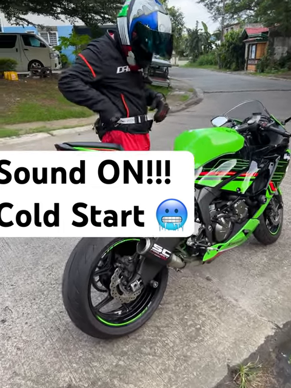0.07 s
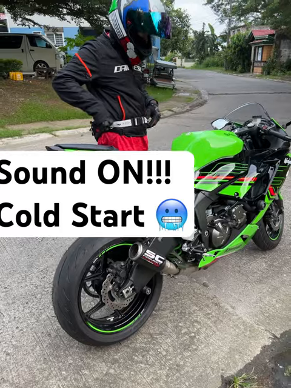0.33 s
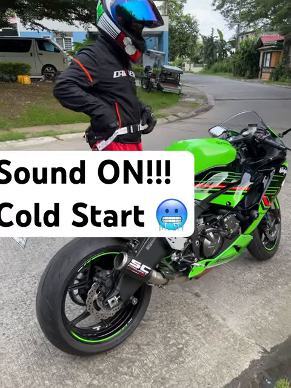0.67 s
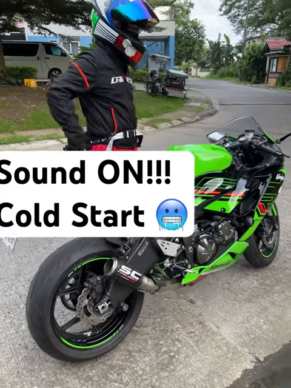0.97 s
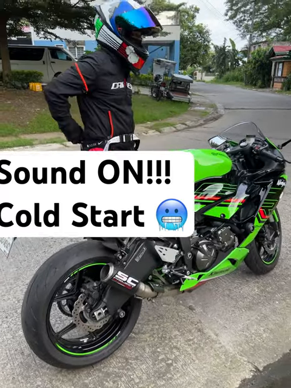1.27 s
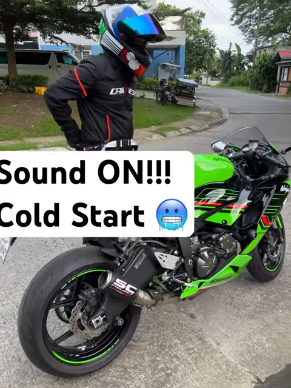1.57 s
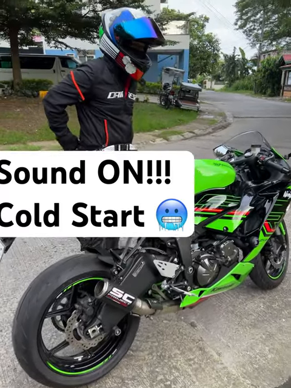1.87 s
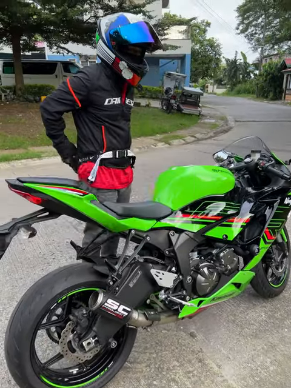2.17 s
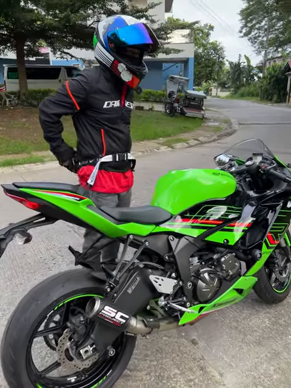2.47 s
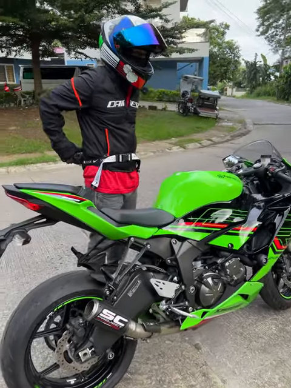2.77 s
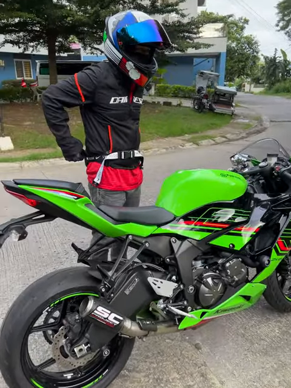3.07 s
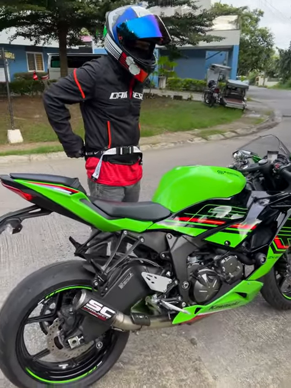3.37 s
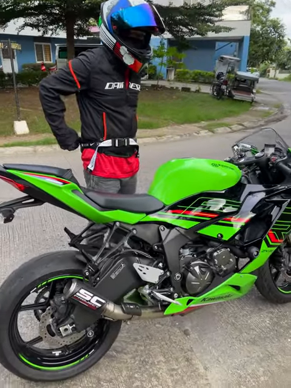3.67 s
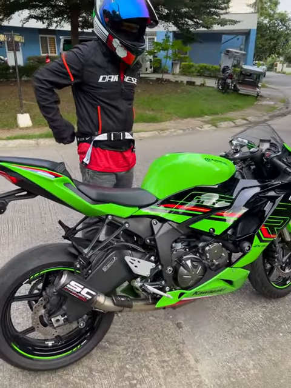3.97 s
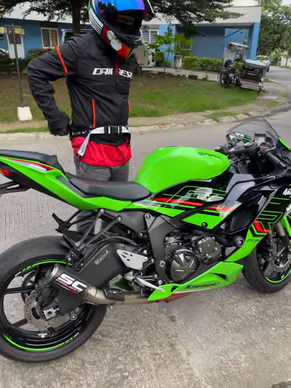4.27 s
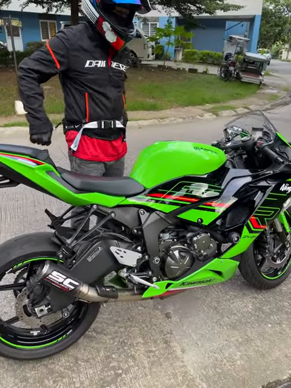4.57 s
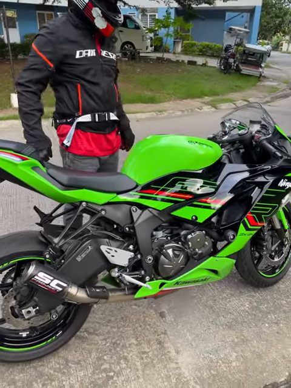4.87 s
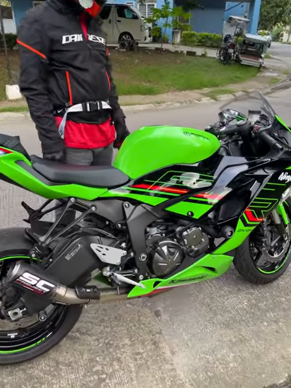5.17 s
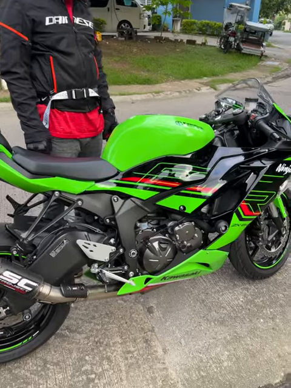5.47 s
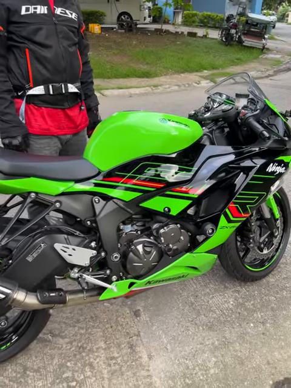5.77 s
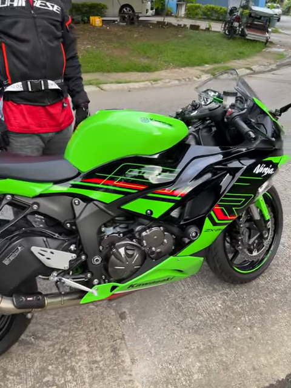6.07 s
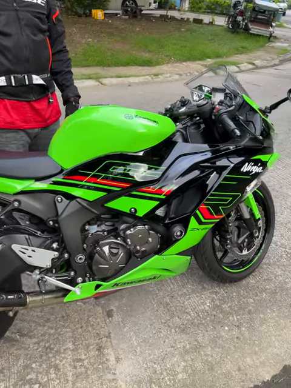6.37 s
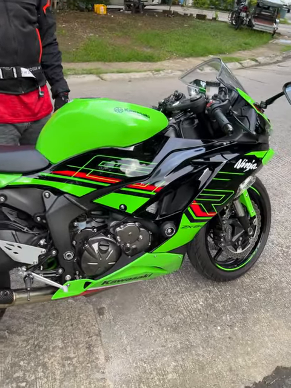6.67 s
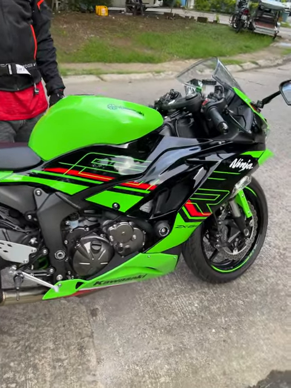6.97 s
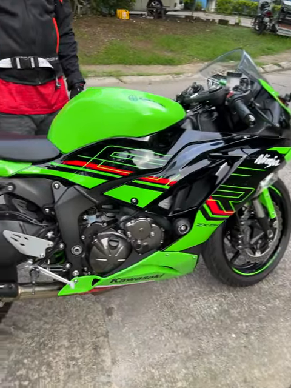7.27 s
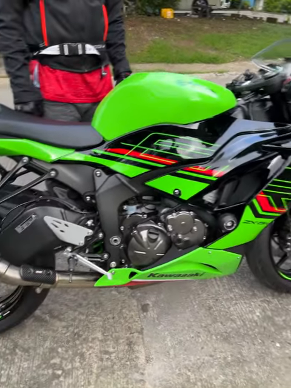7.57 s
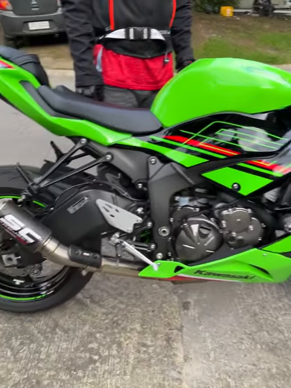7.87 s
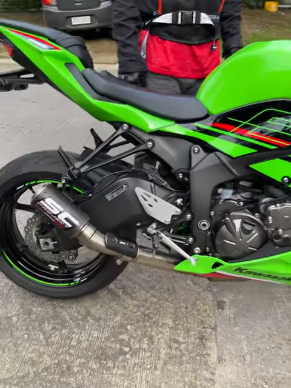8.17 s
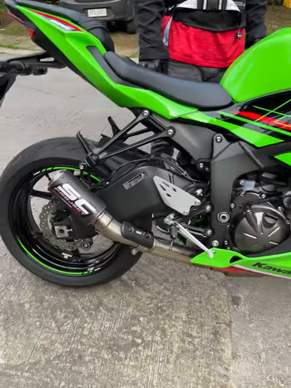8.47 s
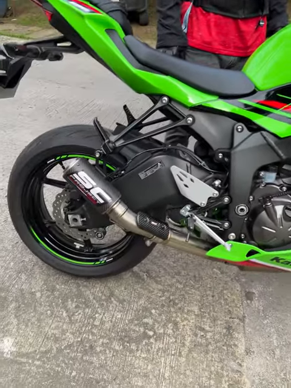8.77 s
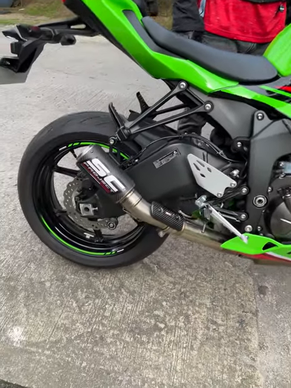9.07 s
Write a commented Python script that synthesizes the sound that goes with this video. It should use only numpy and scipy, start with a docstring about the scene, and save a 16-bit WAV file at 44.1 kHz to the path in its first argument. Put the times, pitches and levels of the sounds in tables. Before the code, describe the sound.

A cold four-cylinder sport motorcycle idles with a steady, deep exhaust drone, stumbling and popping slightly now and then.

```python
"""A four-cylinder sport motorcycle idles, still cold, on an open street.
Every firing sends a low boom, a sharp crack and a puff of gas out of the short exhaust pipe;
now and then the fuel burns weakly and the engine stumbles, or burns hard and pops.
The valves tick and the chain and gears rustle underneath, over a faint echo and the open air.
The tone changes as the microphone moves from the tail along the side of the bike."""
import sys
import numpy as np
from scipy import signal
from scipy.fft import rfft, irfft
from scipy.io import wavfile

SR = 44100
rng = np.random.default_rng(int(sys.argv[2]) if len(sys.argv) > 2 else 0)


def master(y):
    """Save y as 16-bit WAV."""
    cut = np.clip(np.atleast_2d(y).T, -1, 1)
    pcm = np.round(cut * 32767)  # scale
    wavfile.write(sys.argv[1], SR, pcm.astype(np.int16))


N = 410571
TIME = np.arange(N) / SR
IDLE_HZ = 54.5  # typical number of firings a second

# How often the engine fires, creeping up as it warms: t/s, f/Hz
FIRING_RATE = [(0.0, 53.74), (0.63, 53.23), (1.37, 54.27), (1.53, 53.01), (1.78, 54.47), (2.33, 53.6),
               (3.05, 54.23), (3.15, 55.16), (3.26, 54.19), (3.9, 54.57), (4.0, 55.18), (4.7, 54.83),
               (4.79, 53.65), (5.46, 54.96), (5.93, 54.48), (6.68, 55.25), (8.3, 54.87), (9.1, 55.3),
               (9.31, 57.5)]
# The cylinders in firing order, every second one unsteady: boom level/dB, crack level/dB, delay/s,
# push on the pipe branches (+ one, - the other), burn spread/dB, crack spread/dB
FOUR_CYLINDERS = [(0.2, 2.5, .00009, 0.77, .85, 1.8), (-0.1, -1.5, -.00007, -1.4, .45, .8),
                  (0.22, 2.2, .0001, -0.14, 0.84, 1.9), (-0.018, 0.6, -.0001, -1.5, .55, .8)]
def firings():
    """The cylinders fire in turn: gives each firing's time, boom size, crack size and branch push."""
    count = np.cumsum(curve(FIRING_RATE, TIME)) / SR
    times = np.interp(np.arange(.55, count[-1]), count, TIME)
    cylinders = np.array(FOUR_CYLINDERS)[np.arange(len(times)) % len(FOUR_CYLINDERS)]
    boom_db, crack_db, late_s, push, burn_spread_db, crack_spread_db = cylinders.T
    burn_db, sharp_db = burns(times, burn_spread_db, crack_spread_db)
    times = times + late_s + crank_lag(burn_db)
    return times, gain_of(boom_db + burn_db), gain_of(crack_db + burn_db + sharp_db), push


# Stumbles, where the fuel barely burns: t/s, change in level/dB
STUMBLES = [(0.084, -7), (0.235, -3), (0.272, -4.5), (0.383, -5), (0.421, -3.5), (0.609, -4.5), (1.02, -3),
            (1.352, -3.5), (1.983, -3), (2.317, -9), (2.653, -7.5), (2.8, -4), (4.412, -6.5), (4.927, -7),
            (5.075, -5.5), (7.08, -7), (7.226, -6.5), (8.024, -5), (8.751, -5)]
# Pops, where the fuel burns hard: t/s, extra crack level/dB
POPS = [(0.047, 3), (0.572, 5), (1.057, 4), (1.614, 3.5), (1.726, 5), (2.242, 3), (2.616, 4), (5.879, 6.5),
        (6.646, 4.5), (7.262, 7), (8.461, 4), (8.933, 3)]
def burns(times, burn_spread_db, crack_spread_db, rebound=0.18, crack_rebound=0.092):
    """How well each firing burns and how sharply it cracks; a poor burn leaves fuel for the next."""
    a, b, sharpness = rng.standard_normal((len(times), 3)).T
    burn_db = burn_spread_db * (1 - np.minimum((a ** 2 + b ** 2) / 2, 4))  # mostly good, sometimes poor
    sharp_db = crack_spread_db * np.clip(sharpness, -2, 1.5)
    for when, db in STUMBLES:
        nearest = np.argmin(abs(times - when))
        burn_db[nearest], sharp_db[nearest] = db, 0
    for when, db in POPS:
        nearest = np.argmin(abs(times - when))
        burn_db[nearest], sharp_db[nearest] = 0, db
    previous_db = np.append(0, burn_db[:-1])
    return burn_db - rebound * previous_db, sharp_db - crack_rebound * previous_db


def crank_lag(burn_db, sag_rise_s=.07, recover_s=.14, wander_s=.00025, jitter_s=.00005):
    """Seconds each firing is late: a weak burn slows the engine and the idle control pulls it back."""
    t = np.arange(len(burn_db)) / IDLE_HZ
    jitter, drift = rng.standard_normal((len(t), 2)).T
    sag_shape = (1 - np.exp(-t / sag_rise_s)) * np.exp(-t / recover_s)
    sag_s = .00042 * np.convolve(-burn_db, sag_shape)[:len(t)]
    # the light flywheel lets the speed wander a few times a second
    wander = filtered(drift, 2, [2.5, 6], "band", rate=IDLE_HZ)
    return sag_s + wander_s * evened(wander) + jitter_s * jitter


# Where the microphone is: t/s, place (0 behind the tail, 1 by the rear wheel, 2 beside the engine,
# 3 beside the silencer, more is further on)
MIC_PATH = [(0, 0.42), (1.5, 0.5), (2.1, 1.18), (4.1, 1.26), (5.3, 2.07), (6.3, 2.63), (7.7, 4.4),
            (9.31, 5)]
# Loudness along the way, before each sound adds its own offset:
# t/s, boom level/dB, throb level/dB, crack level/dB, gas and machinery level/dB
LOUDNESS = [(0, -14, -15, -31.5, -45.5), (0.6, -14, -16.5, -33.5, -46.7), (1.6, -14, -17, -33, -48),
            (2.1, -13, -20.3, -35, -48), (3.2, -14, -22, -36, -48.5), (4.9, -16, -26.5, -38.5, -48.5),
            (5.5, -15.5, -27, -36.5, -47.5), (7.2, -18, -27, -42, -48), (8.3, -18, -24, -37.5, -46.5),
            (9.3, -17.5, -22.7, -36, -46.5)]
# Tone of the boom from behind and from the side: multiple of IDLE_HZ, level/dB
BOOM_TONE_BEHIND = [(1, -17), (2, -14), (3, -10), (4, -12), (5, 5.5), (6, 1), (7, 3.5), (8, -4), (9, -17.5),
                    (10, -16), (11, -30.5), (12, -28), (13, -43), (14, -37.5)]
BOOM_TONE_SIDE = [(1, -7.5), (2, -8), (3, -3), (4, -4.5), (5, 5.5), (6, 1.5), (7, 3.5), (8, -4.5),
                  (9, -17.5), (10, -63), (11, -21), (12, -22), (13, -39.5), (14, -32.5)]
# Notes of the gas swinging between the two pipe branches: f/Hz, width/Hz, level/dB
BRANCH_NOTES = [(174.8, 12, -10), (359.5, 15.5, -3.5), (386, 20, 0.5), (500, 49, -1)]
def exhaust_boom(times, sizes, push, lag_s=0.0012, branch_db=-19.5, sloshing=0.89, throb_db=-1.0):
    """Pressure pulses ring the pipe and swing the gas between its two branches."""
    times = times + lag_s
    # the pistons pump the same volume however well the fuel burns, so the lowest notes stay even
    pulses = clicks(times, np.ones(len(times))) + filtered(clicks(times, sizes - 1), 1, 90, "high")
    views = [coloured(pulses, [(multiple * IDLE_HZ, db) for multiple, db in tone])
             for tone in (BOOM_TONE_BEHIND, BOOM_TONE_SIDE)]
    pipe = from_place(views, curve(MIC_PATH, TIME) - .9)
    # the lowest throb comes straight from the outlet and swells when the microphone is near it
    throb = signal.sosfiltfilt(signal.butter(6, 195, fs=SR, output="sos"), pipe)
    t = TIME[:SR // 8]
    ring = sum((-1) ** k * gain_of(db) * np.exp(-np.pi * width * t) * np.sin(2 * np.pi * hz * t)
               for k, (hz, width, db) in enumerate(BRANCH_NOTES))
    pushes = sizes * push * (1 + sloshing * rng.standard_normal(len(times)))
    swing = coloured(ringing(clicks(times, pushes), ring), [(100, 0), (500, 0)])
    body = evened(pipe - throb) + gain_of(branch_db) * evened(swing)
    throb_gain = gain_of(curve(LOUDNESS, TIME, column=2) + throb_db)
    return gain_of(curve(LOUDNESS, TIME)) * body + throb_gain * evened(throb)


# Tone of the crack at places 0 to 3: f/Hz, level/dB
CRACK_AT_TAIL = [(350, -29), (600, 6.5), (715, -1), (800, -10), (1060, -3), (1260, -1), (1370, -20),
                 (1470, 0), (1630, -26), (1940, -1.5), (2640, -25.5), (3170, -8), (3860, -27), (4500, -13),
                 (7000, -13), (9100, -52), (15400, -120)]
CRACK_AT_WHEEL = [(350, -22), (600, 1), (658, 5.5), (784, -5), (878, -13), (905, -12.5), (1070, 0),
                  (1260, -11), (1440, -5.5), (1660, -5), (2000, -12), (2150, -30), (2280, -10), (2580, -15),
                  (7000, -28), (9100, -67), (15400, -120)]
CRACK_AT_ENGINE = [(330, -46), (560, -8.5), (590, -1.5), (663, 6), (777, -9), (855, -8), (1200, -7),
                   (1330, -1), (1650, -6), (1790, -15), (1930, -12), (2380, -18.5), (2910, -15),
                   (6100, -38), (7000, -29), (9100, -59), (15400, -120)]
CRACK_AT_SILENCER = [(350, -17), (600, -7.5), (672, 7), (760, -13.5), (905, -2), (973, -14.5), (1180, -8),
                     (1480, -6), (1730, -15.5), (2040, -16), (2530, -22.5), (2780, -12.5), (2980, -20.5),
                     (3550, -32), (7000, -51), (9100, -64), (15400, -120)]
def exhaust_crack(times, sizes, burst_db=-4, tail_db=-7, tearing_hz=900, front_hz=2200):
    """The steep front of each pulse snaps at the outlet and tears into swirls of gas."""
    times = times - .0007
    arrivals = times + .00007 * rng.standard_normal(len(times))
    # a harder burn only steepens the front, so its lower notes buzz evenly
    steepening = filtered(clicks(arrivals, sizes - 1), 1, tearing_hz, "high")
    front = evened(clicks(arrivals, np.ones(len(times))) + steepening)
    front = filtered(front, 2, front_hz, "low")
    burst = gain_of(burst_db) * puffs(times - .0006, sizes, rise_s=0.00066, decay_s=0.001)
    tail = gain_of(tail_db) * puffs(times, sizes, rise_s=0.0022, decay_s=0.0054)
    # the swirls are small, so they hiss only above the buzz of the pipe
    swirls = filtered(burst + tail, 2, [tearing_hz, 4000], "band")
    snap = off_ground(front + swirls)
    views = [coloured(snap, tone)
             for tone in (CRACK_AT_TAIL, CRACK_AT_WHEEL, CRACK_AT_ENGINE, CRACK_AT_SILENCER)]
    return gain_of(curve(LOUDNESS, TIME, column=3)) * from_place(views, curve(MIC_PATH, TIME))


# Tone of the escaping gas: f/Hz, level/dB
HISS_TONE = [(1500, -15.5), (3000, 2.5), (4500, -1), (6000, -4.5), (9800, -9), (11500, -4.5), (12400, -5.5),
             (15500, -7.5)]
def gas_hiss(times, sizes, offset_db=-3.5, spread_db=1):
    """Gas hisses out of the pipe with each pulse, loudest from behind."""
    sizes = sizes ** 0.25 * gain_of(spread_db * rng.standard_normal(len(times)))
    jet = puffs(times - .0014, sizes, rise_s=0.00061, decay_s=0.008)
    aim_db = -.6 * curve(MIC_PATH, TIME)
    level_db = curve(LOUDNESS, TIME, column=4) + offset_db + aim_db
    return gain_of(level_db) * evened(coloured(jet, HISS_TONE))


# Notes of the engine covers: f/Hz, time to fade by 60 dB/s, level/dB
COVER_NOTES = [(1326, 0.028, 4.5), (1980, 0.016, 1.5), (2800, 0.013, -5), (3530, 0.011, -4.5),
               (4500, 0.0039, -10), (11800, 0.0038, -4), (13000, .04, -22)]
# Tone of the chain and gears: f/Hz, level/dB
RUSTLE_TONE = [(300, -12.5), (650, 2.5), (1400, -2), (2100, -5.5), (2900, -6), (3500, -6.5), (3900, -10),
               (4700, -10), (5700, -17.5), (9800, -23), (11500, -19.5), (12400, -22), (15500, -25)]
def machinery(times, rustle_db=4.0, tick_db=-3, spread_db=3, tapping=0.31):
    """Valves land twice a firing and ring the covers, over the rustle of chain and gears."""
    landings = np.concatenate([times + .0043, times + .0135])
    sizes = gain_of(spread_db * rng.standard_normal(len(landings)))
    taps = puffs(landings, sizes, rise_s=0.00016, decay_s=0.003)
    t = TIME[:SR // 10]
    ring = sum(gain_of(db - 60 * t / fade_s) * np.sin(2 * np.pi * hz * t)
               for hz, fade_s, db in COVER_NOTES)
    ticks = gain_of(tick_db) * evened(ringing(taps, ring))
    rattle = off_bodywork(rng.standard_normal(N) + tapping * taps)
    rustle = gain_of(rustle_db) * evened(coloured(rattle, RUSTLE_TONE))
    return gain_of(curve(LOUDNESS, TIME, column=4)) * (rustle + ticks)


def off_ground(x, bounce=0.072, base_delay_s=0.00292):
    """Adds the bounce off the concrete, which comes later as the microphone moves on."""
    delay_s = base_delay_s * (1 + 0.065 * curve(MIC_PATH, TIME))
    return x + bounce * np.interp(TIME - delay_s, TIME, x)


def off_bodywork(x, scatter_db=-4, fade_s=0.063, count=12):
    """Panels and metal parts scatter the sound along paths that change as the microphone moves."""
    t = TIME[:SR // 16]
    paths = rng.standard_normal((count, len(t))) * gain_of(-60 * t / fade_s)
    scattered = from_place([ringing(x, path) for path in paths], np.linspace(0, count - 1, N))
    return evened(x) + gain_of(scatter_db) * evened(scattered)


# Tone of the open air: f/Hz, level/dB
AIR_TONE = [(20, -7), (60, 10), (200, -17), (500, -1), (1000, -16), (4000, -25)]
def street(bike, echo_db=-26, fade_s=0.46, air_db=-52):
    """A faint echo from houses and trees, and the low murmur of the open air."""
    t = TIME[:SR // 2]
    scatter = rng.standard_normal(len(t)) * gain_of(-60 * t / fade_s) * (t > .02)
    echo = ringing(bike, scatter / np.linalg.norm(scatter))
    air = evened(coloured(rng.standard_normal(N), AIR_TONE))
    return gain_of(echo_db) * echo + gain_of(air_db) * air


def gain_of(db):
    """Turns decibels into a number to multiply by."""
    return 10 ** (np.asarray(db) / 20)


def evened(x):
    """Scales a sound to an average strength (rms) of 1."""
    return x / np.sqrt(np.mean(x ** 2) + 1e-20)


def curve(rows, t, column=1):
    """Reads a table column at the times t, in straight lines from row to row."""
    rows = np.asarray(rows)
    return np.interp(t, rows[:, 0], rows[:, column])


def filtered(x, order, hz, keep, rate=SR):
    """Keeps the lows, the highs or a band; a higher order cuts more steeply."""
    return signal.sosfilt(signal.butter(order, hz, keep, fs=rate, output="sos"), x)


def ringing(x, response):
    """Lets every sample of x set off its own copy of the response."""
    return signal.oaconvolve(x, response)[:N]


def coloured(x, tone, size=8192):
    """Shapes a sound by rows of f/Hz, level/dB, falling 36 dB an octave beyond both ends."""
    hz, db = np.transpose(tone)
    octave = np.log2(np.maximum(np.fft.rfftfreq(size, 1 / SR), 1))
    outside = np.maximum(np.log2(hz[0]) - octave, 0) + np.maximum(octave - np.log2(hz[-1]), 0)
    shape_db = np.maximum(np.interp(octave, np.log2(hz), db) - 36 * outside, -100)
    # these steps make the filter ring only after a click, never before it
    cepstrum = irfft(np.log(gain_of(shape_db)))
    cepstrum[1:size // 2] *= 2
    cepstrum[size // 2 + 1:] = 0
    return ringing(x, irfft(np.exp(rfft(cepstrum)))[:size // 2])


def clicks(times, sizes):
    """One click at each time."""
    return np.bincount(np.maximum(np.round(times * SR), 0).astype(int), sizes, N)[:N]


def puffs(times, sizes, rise_s, decay_s):
    """A short burst of noise at each time."""
    t = TIME[:SR // 10]
    shape = (1 - np.exp(-t / rise_s)) * np.exp(-t / decay_s)
    return evened(ringing(clicks(times, sizes), shape) * rng.standard_normal(N))


def from_place(views, place):
    """Blends between views: the same sound as heard at neighbouring places."""
    place = np.clip(place, 0, len(views) - 1)
    return sum(np.maximum(1 - abs(place - k), 0) * evened(view) for k, view in enumerate(views))


def scene():
    """Exhaust and machinery, driven by the same firings, in the street."""
    times, boom_sizes, crack_sizes, push = firings()
    bike = exhaust_boom(times, boom_sizes, push) + exhaust_crack(times, crack_sizes)
    bike = bike + gas_hiss(times, crack_sizes) + machinery(times)
    return (bike + street(bike))[None]


def record(dry, edge_hz=15750):
    """Cuts away the very highest treble."""
    treble_cut = signal.firwin(511, edge_hz, window=("kaiser", 9), fs=SR)
    return signal.oaconvolve(dry, treble_cut[None], "same")


dry = scene()
out = record(dry)
master(out)
```